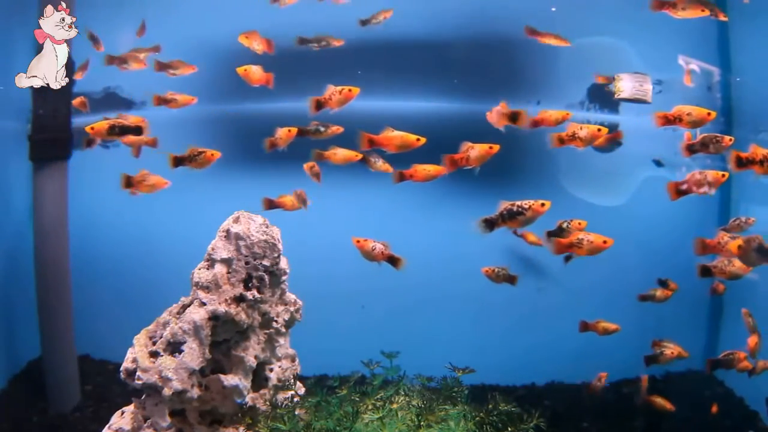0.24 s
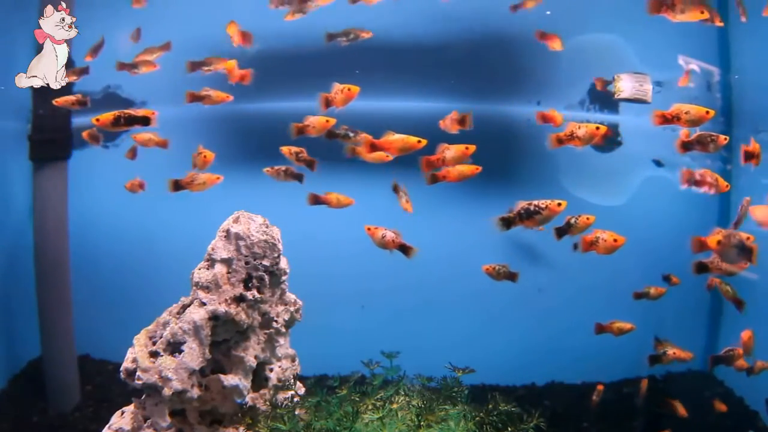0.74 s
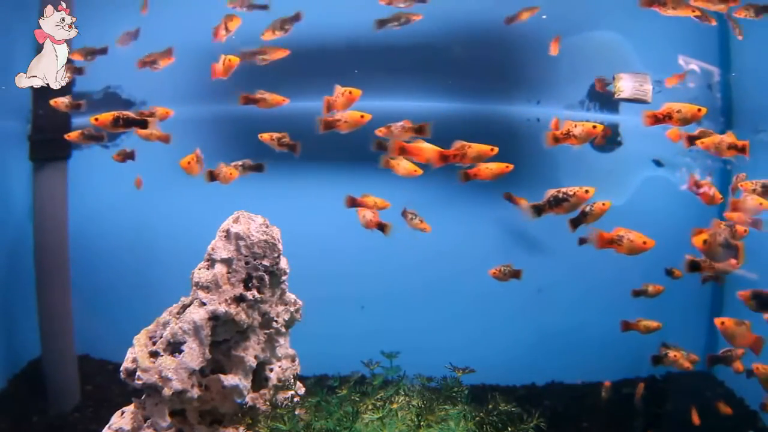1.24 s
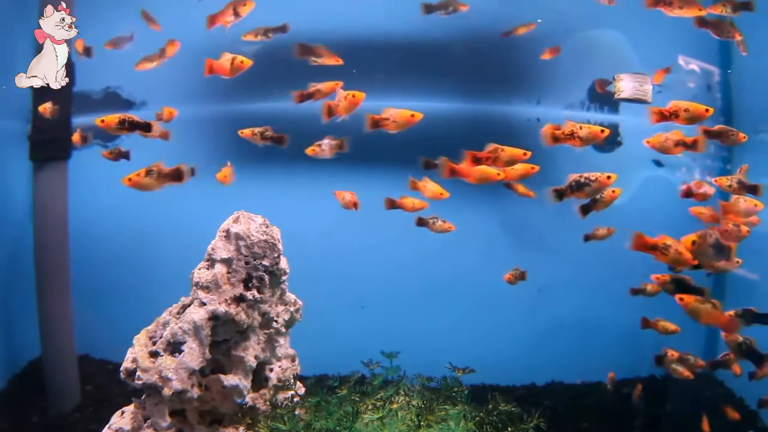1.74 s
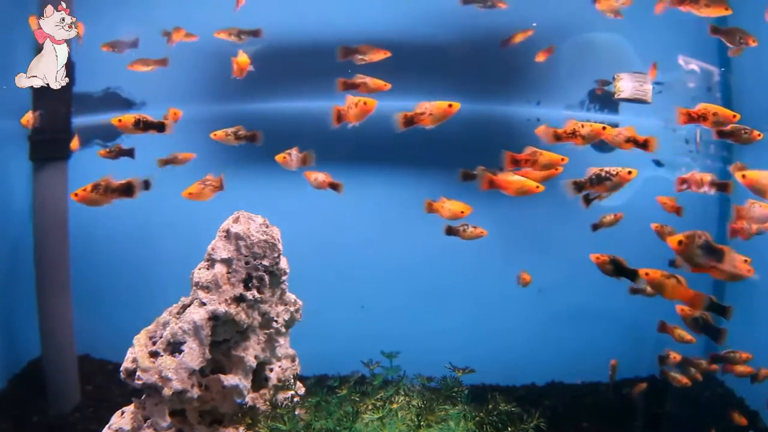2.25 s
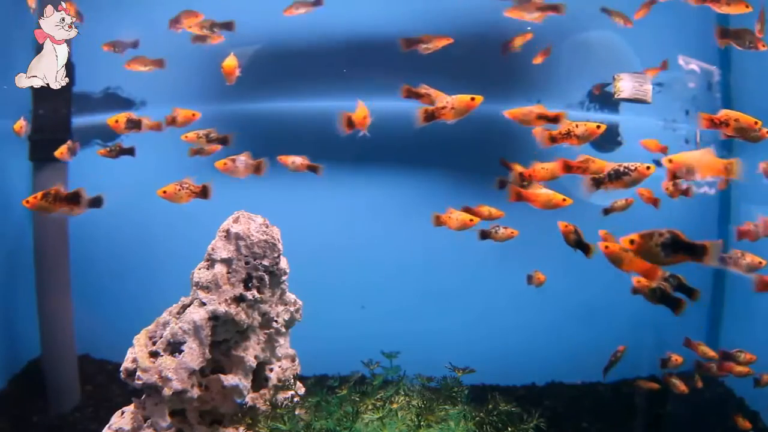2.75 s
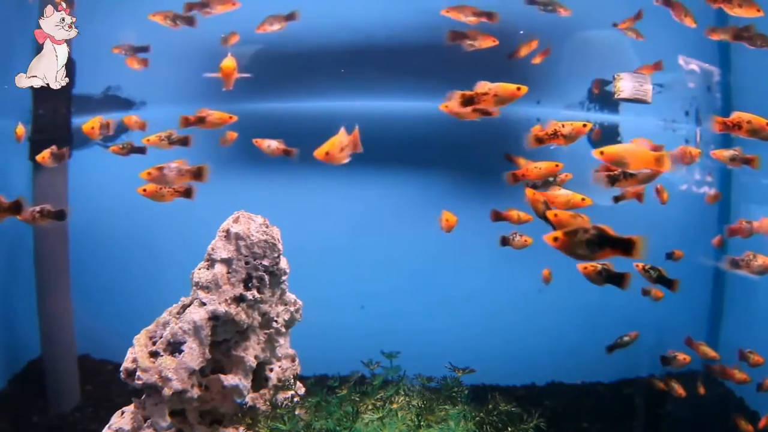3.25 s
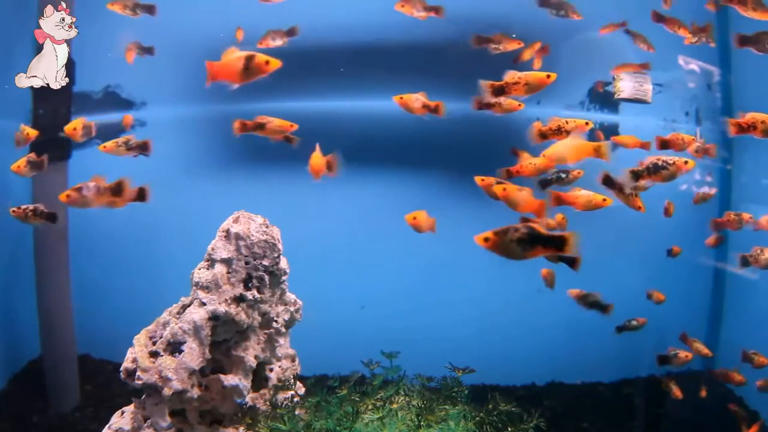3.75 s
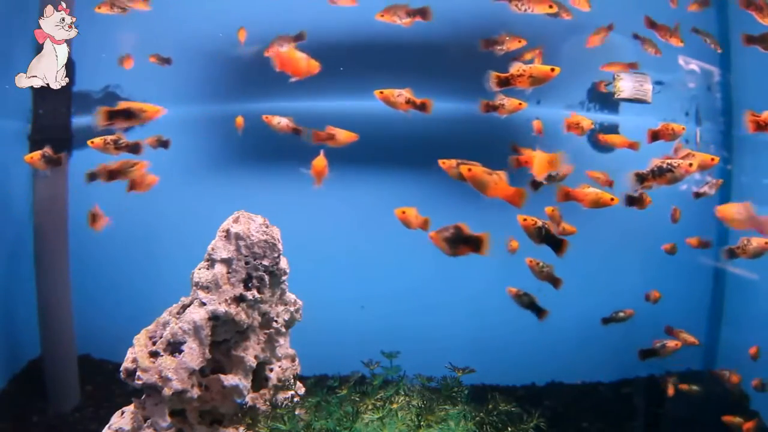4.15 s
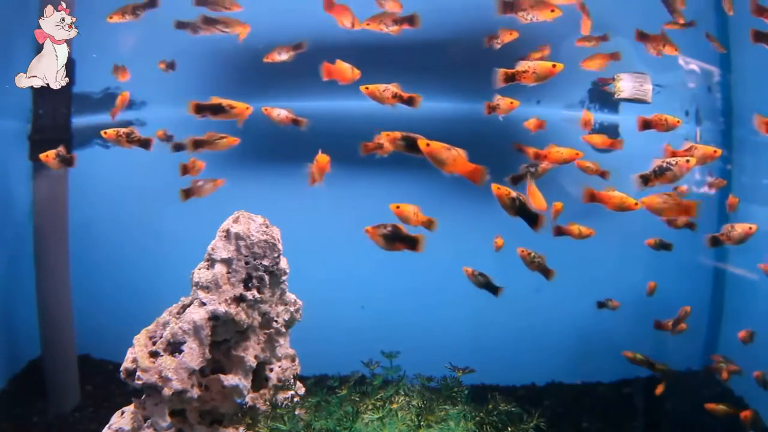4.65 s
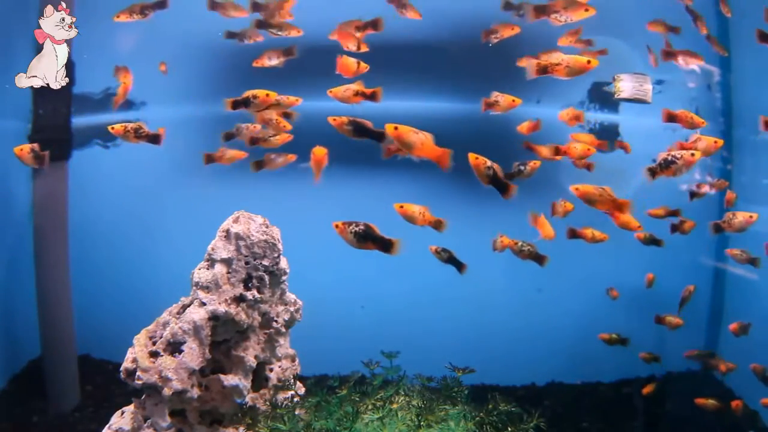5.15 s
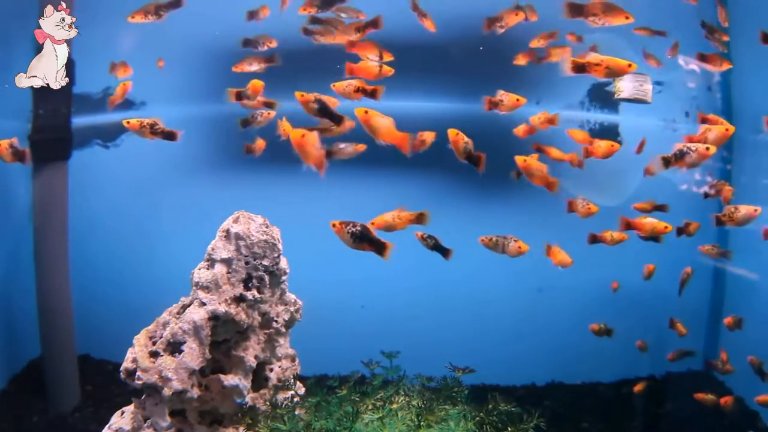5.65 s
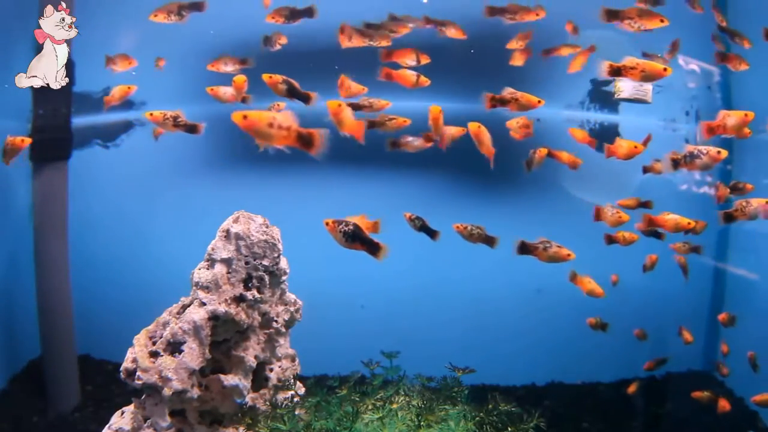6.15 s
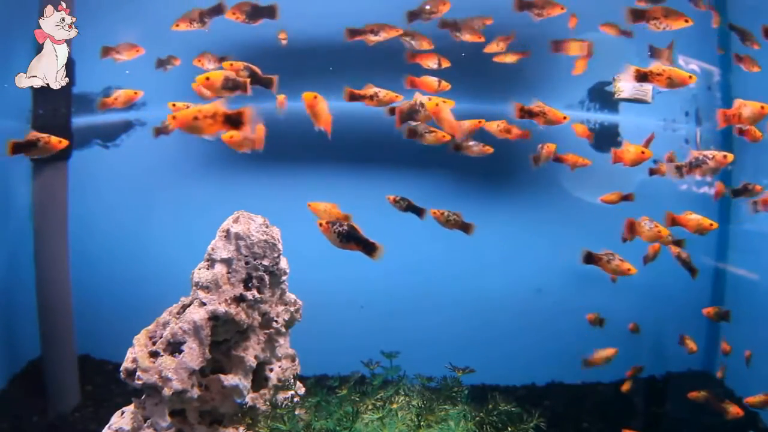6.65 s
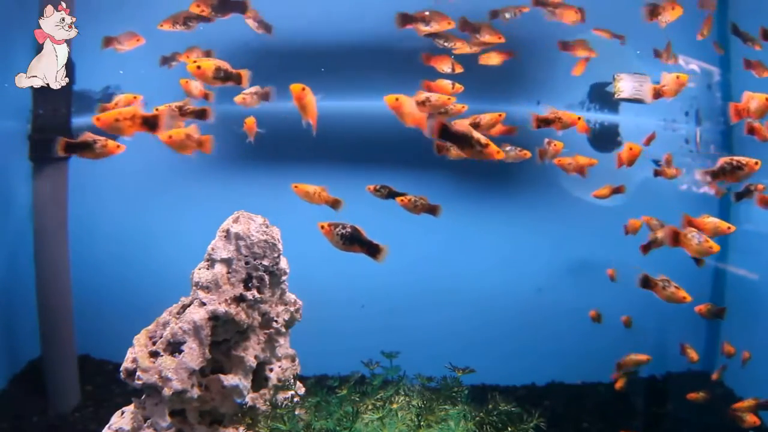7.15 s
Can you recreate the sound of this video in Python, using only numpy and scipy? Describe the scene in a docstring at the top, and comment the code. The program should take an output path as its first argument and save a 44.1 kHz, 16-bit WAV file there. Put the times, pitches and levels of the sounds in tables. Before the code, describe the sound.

Water trickles into a fish tank from the filter's outflow for the whole seven and a half seconds, heard close up in a small room. The sound is light and bright: a continuous fine fizz and gurgle of tiny bubbles, dotted with sharp ticking drops and short, high bubble plinks, many each second at uneven gaps. The flow sputters, swelling and easing a little without ever stopping. The sharpest drops land at about 1.1 to 1.3 seconds, 2.9, 3.4 and 7.2 seconds, and stronger bubbles ring out near 0.5, 2.5, 3.7 and 5.5 seconds. Slightly heavier spills add a soft slap and spatter around 0.7, 1.9, 3.4, 3.8, 4.8 and 6.6 seconds. The glass walls and the air above the water give everything a very short, slightly hollow echo. Underneath, a faint pump hum and the filter's low rush stay steady.

```python
"""A small room with a fish tank: the filter's return flow trickles into the water.
Drops tick on the surface, trapped air bubbles ring briefly and heavier spills slap.
The glass walls and the room echo each one, and the air space over the water resonates.
Underneath run a gurgle and fizz of tiny bubbles, the pump's hum and the filter's low rush."""
import sys
import numpy as np
from scipy import signal
from scipy.fft import rfft, irfft, next_fast_len
from scipy.io import wavfile
from scipy.ndimage import uniform_filter1d, map_coordinates

SR = 44100
rng = np.random.default_rng(int(sys.argv[2]) if len(sys.argv) > 2 else 0)


def master(y):
    """Save y as 16-bit WAV."""
    cut = np.clip(np.atleast_2d(y).T, -1, 1)
    pcm = np.round(cut * 32767)  # scale
    wavfile.write(sys.argv[1], SR, pcm.astype(np.int16))


N = 326340
EVENT_TIME_S = np.arange(SR // 25) / SR  # time axis of one bubble or burst


def amp(db):
    """Decibels to gain."""
    return 10 ** (np.asarray(db) / 20)


def unit_rms(x):
    """x at rms 1."""
    return x / np.sqrt(np.mean(x ** 2) + 1e-20)


def filtered(x, response):
    """x through a frequency response."""
    size = next_fast_len(N + SR // 4)
    return irfft(rfft(x, size) * response(np.fft.rfftfreq(size, 1 / SR)), size)[..., :N]


def coloured(x, curve):
    """x through an EQ curve on a log frequency axis, at rms 1."""
    freq_hz, gain_db = np.transpose(curve)
    return unit_rms(filtered(x, lambda hz: amp(np.interp(np.log(hz + 1), np.log(freq_hz), gain_db))))


def wobble(knots_per_s):
    """Smooth random curve."""
    knots = rng.standard_normal(N // 100)
    return map_coordinates(knots, [np.arange(N) * knots_per_s / SR], mode="mirror")


def add(track, start_s, sound):
    """Mix a stereo sound into the track."""
    start = max(round(start_s * SR), 0)
    part = sound[:, :max(N - start, 0)]
    track[:, start:start + part.shape[1]] += part


def echoes(glass_db, room_db, width, glass_t60_s=0.036, room_t60_s=0.13, pan_scatter_db=1):
    """Stereo path from one spot on the water: direct sound, quick echoes off the glass, then the room."""
    t = np.arange(SR // 5) / SR
    glass = amp(-60 * t / glass_t60_s) * (1 - np.exp(-t / 0.00025))
    room = amp(-60 * t / room_t60_s) * (1 - np.exp(-t / 0.005))
    decay = np.hypot(amp(glass_db) * glass / np.linalg.norm(glass),
                     amp(room_db) * room / np.linalg.norm(room))
    mid, side = rng.standard_normal((2, len(t))) * decay
    mid[0] += 1  # direct sound
    pan_db = rng.normal(0, pan_scatter_db) / 2
    return np.array([amp(pan_db) * (mid + width * side), amp(-pan_db) * (mid - width * side)])


def propagate(sound, path, level_db, window_s):
    """A short sound sent along a path, its loudest window scaled to level_db."""
    stereo = signal.fftconvolve(sound[None], path, axes=1)
    power = uniform_filter1d(stereo.mean(0) ** 2, max(int(window_s * SR), 1))
    return amp(level_db) * stereo / np.sqrt(power.max())


def bubble_ring(pitch_hz, cycles, rise, t):
    """A bubble rings down 60 dB over the given cycles, its pitch rising as it nears the surface."""
    age = pitch_hz * t / cycles
    phase = 2 * np.pi * pitch_hz * t * (1 + rise * np.minimum(age, 1))
    return np.sin(phase) * amp(-60 * age) * (1 - np.exp(-2 * pitch_hz * t))


def swarm(rate_per_s, low_hz, high_hz, cycles, spread_db, width, spots=8):
    """Many small bubbles ring at random moments from a few spots; most are faint, a few strong."""
    track = np.zeros((2, N))
    t = EVENT_TIME_S[:len(EVENT_TIME_S) // 3]
    for _ in range(spots):
        when, pitch, strength = rng.random((int(rate_per_s * N / SR / spots), 3)).T[..., None]
        gain = amp(spread_db * np.minimum(-np.log(1 - strength), 3))
        tones = gain * bubble_ring(low_hz * (high_hz / low_hz) ** pitch, cycles, rise=0.021, t=t)
        indices = (when * N).astype(int) + np.arange(len(t))
        spot = np.bincount(indices.ravel(), tones.ravel(), N)[:N]
        path = echoes(glass_db=6.0, room_db=2, width=width)
        track += signal.oaconvolve(spot[None], path, axes=1)[:, :N]
    return track


# Trickle strength: time_s, gurgle_db, spray_db
FLOW_LEVELS = [(0.0, -42.5, -40), (0.35, -43.5, -39), (0.7, -52.5, -41), (0.97, -43, -37), (1.35, -50, -43),
               (1.75, -49.5, -41.5), (2.3, -45, -39.5), (2.7, -46, -40), (3.2, -43.5, -38),
               (3.6, -44.5, -37.5), (4.35, -45, -38), (4.7, -47.5, -39.5), (5.4, -44, -37),
               (5.85, -43, -37.5), (6.05, -45.5, -41), (6.6, -51.5, -36.5), (6.95, -44.5, -41),
               (7.4, -44, -39)]


def flow_db(time_s):
    """Gurgle and spray levels as the flow swells and eases."""
    knots_s, gurgle_db, spray_db = np.transpose(FLOW_LEVELS)
    return {"gurgle": np.interp(time_s, knots_s, gurgle_db),
            "spray": np.interp(time_s, knots_s, spray_db)}


# Gurgle EQ: freq_hz, gain_db
GURGLE_EQ = [(300, -37), (1000, -12), (1400, -14.5), (1900, -14), (2500, -1.5), (3100, -3), (4000, -2.5),
             (5200, -1.5), (6500, -10), (10000, -30)]
# Spray EQ: freq_hz, gain_db
SPRAY_EQ = [(700, -38), (2000, -3), (4500, -12.5), (6200, -10), (7200, -7), (8500, -4), (10700, -2),
            (13000, 2), (14500, 1), (16000, 0.5)]
# Droplet EQ: freq_hz, gain_db
PATTER_EQ = [(300, -24), (900, -11), (1800, -10), (3000, 2), (4500, -8), (6000, -8), (9000, 2),
             (11500, 1.5), (16000, 4)]


def trickle(gurgle_db=-3.0, spray_db=-2.0, patter_db=-6.5, sputter_db=1.38, sputters_per_s=34):
    """Small bubbles gurgle, spray fizzes, droplets patter; all follow the flow and sputter together."""
    level_db = flow_db(np.arange(N) / SR)
    sputter = amp(sputter_db * wobble(sputters_per_s))
    bubbles = swarm(rate_per_s=320, low_hz=1052, high_hz=6020, cycles=32, spread_db=4.0, width=0.5)
    spray = swarm(rate_per_s=700, low_hz=4000, high_hz=16000, cycles=13.3, spread_db=5.0, width=0.67)
    # droplets too small to trap air click and hardly ring
    patter = swarm(rate_per_s=55, low_hz=3460, high_hz=10500, cycles=4.6, spread_db=3, width=0.57)
    gurgle = amp(gurgle_db) * coloured(bubbles, GURGLE_EQ)
    fizz = amp(spray_db) * coloured(spray, SPRAY_EQ) + amp(patter_db) * coloured(patter, PATTER_EQ)
    return sputter * (amp(level_db["gurgle"]) * gurgle + amp(level_db["spray"]) * fizz)


# Air space resonances: pitch_hz, bandwidth_hz, gain_db
AIR_MODES = [(841, 54, 8), (1256, 17, 0.5), (1554, 56, 7), (1802, 24, 7.5), (2206, 45, -0.5),
             (2950, 105, -1), (3296, 99, -2), (3660, 32, 3), (4390, 66, -5), (4640, 170, -2.5),
             (6630, 590, -2.5), (8160, 380, -9.5), (10680, 1250, -4.5)]


def air_space(water, gain_db=-4):
    """The air over the water rings on at its own pitches."""
    def response(hz):
        return sum(amp(mode_db) * 1j * hz * band_hz / (pitch_hz ** 2 - hz ** 2 + 1j * hz * band_hz)
                   for pitch_hz, band_hz, mode_db in AIR_MODES)
    return amp(gain_db) * filtered(water, response)


# Rush spectrum, common to both channels: freq_hz, gain_db
RUSH_MID_EQ = [(20, -12), (50, -11), (100, -10.5), (140, -5.5), (210, -10), (280, -3), (350, 3),
               (410, -0.5), (550, -5), (635, 0.5), (745, -8.5), (840, -3.5), (960, -10.5), (1200, -3.5),
               (2000, -26.5), (8000, -15)]
# Rush spectrum, stereo side: freq_hz, gain_db
RUSH_SIDE_EQ = [(20, -6), (90, -16), (140, 2.5), (220, -5), (400, -8.5), (900, -10.5), (4000, -18)]


def filter_rush(mid_db=-55.0, side_db=-58.0):
    """Low, steady rush of the filter in the room."""
    mid = amp(mid_db) * coloured(rng.standard_normal(N), RUSH_MID_EQ)
    side = amp(side_db) * coloured(rng.standard_normal(N), RUSH_SIDE_EQ)
    return np.array([mid + side, mid - side])


# Pump harmonics: mains_multiple, level_db
PUMP_HARMONICS = [(1, -73), (3, -82), (4, -98), (6, -71.5), (7, -80), (8, -73), (9, -77), (14, -74.5)]


def pump_hum(mains_hz=60, left_db=6.5):
    """The pump hums on multiples of the mains; its lowest note leans left."""
    t = np.arange(N) / SR
    tones = [np.sqrt(2) * amp(level_db) * np.sin(2 * np.pi * (multiple * mains_hz * t + rng.random()))
             for multiple, level_db in PUMP_HARMONICS]
    return tones[0] * amp([[left_db], [-left_db]]) + sum(tones[1:])


def splash(centre_hz, width_oct, t60_s, attack_s, low_cut_hz=480):
    """Torn water: a brief burst of band noise with no bass."""
    t = EVENT_TIME_S
    hz = np.fft.rfftfreq(len(t), 1 / SR) + 1
    noise = rng.standard_normal(len(t)) * amp(-60 * t / t60_s) * (1 - np.exp(-t / attack_s))
    delayed = np.roll(noise, SR // 1000)  # builds up just after contact
    band = 1 / (1 + (np.log2(hz / centre_hz) / width_oct) ** 2) ** 0.75
    low_cut = 1 / (1 + (low_cut_hz / hz) ** 3)
    return unit_rms(irfft(rfft(delayed) * band * low_cut))


def shed_events(part, rate_per_s, pitch_hz, scatter_oct, over_flow_db, scatter_db):
    """Events the stream sheds at uneven gaps, as loud as its flow: start_s, level_db, pitch_hz."""
    late, strength, detune = rng.standard_normal((int(rate_per_s * N / SR), 3)).T
    start_s = (np.arange(len(late)) + 0.5 + 0.5 * late) / rate_per_s
    level_db = flow_db(start_s)[part] + over_flow_db + scatter_db * strength
    return list(zip(start_s, level_db, pitch_hz * 2 ** (scatter_oct * detune)))


# Loudest drops: start_s, level_db, snap_hz, low_splash_db
LOUD_DROPS = [(0.026, -21.5, 10200, -25), (0.21, -21, 8550, -0.5), (0.347, -23, 8900, -4),
              (0.415, -24.5, 9400, 1), (0.665, -19.5, 11100, -32), (0.756, -20.5, 11100, -30),
              (1.098, -14.5, 11300, -19), (1.186, -12.5, 10900, -17), (1.251, -16, 10300, -28),
              (1.444, -24, 6400, -1), (1.544, -19, 11500, -30), (1.783, -22.5, 9300, -6),
              (2.597, -21, 9100, -19), (2.753, -22, 10900, -30), (2.879, -14.5, 12600, -5),
              (3.325, -17.5, 10400, -5.5), (3.418, -17.5, 10100, -30), (3.854, -21, 7550, -24),
              (4.025, -19.5, 10200, -7), (4.41, -18, 8950, -7), (5.11, -25, 5200, 5),
              (5.322, -19.5, 10600, -4), (5.396, -21.5, 7960, -7), (5.459, -24, 10300, -3),
              (6.047, -23.5, 9000, -26), (6.105, -21.5, 7640, -29), (6.361, -23.5, 8500, -22),
              (6.653, -23, 11700, -18), (7.178, -17, 10300, -14), (7.206, -19.5, 11600, -14),
              (7.296, -24.5, 10300, -19)]


def drops(gain_db=-5.5, low_trim_db=-2, usual_low_db=-14):
    """Each drop hits with a bright snap and a slower, lower, mostly weaker splash."""
    track = np.zeros((2, N))
    usual = shed_events("spray", rate_per_s=5.5, pitch_hz=9500, scatter_oct=0.41,
                        over_flow_db=12, scatter_db=1.5)
    for start_s, level_db, snap_hz, low_db in LOUD_DROPS + [(*row, usual_low_db) for row in usual]:
        snap = splash(snap_hz, width_oct=0.32, t60_s=0.0058, attack_s=0.0011)
        low = splash(centre_hz=3800, width_oct=0.79, t60_s=0.019, attack_s=0.0022)
        drop = snap + amp(low_db + low_trim_db) * low
        path = echoes(glass_db=5.0, room_db=-5.5, width=0.58)
        add(track, start_s, propagate(drop, path, level_db + gain_db, window_s=0.00052))
    return track


# Loudest bubbles: start_s, level_db, pitch_hz
LOUD_BUBBLES = [(0.052, -44, 1160), (0.07, -33, 2960), (0.23, -36, 3700), (0.313, -34, 2970),
                (0.538, -31.5, 3060), (0.61, -35.5, 3290), (0.86, -37, 3280), (0.949, -34.5, 3100),
                (1.048, -41.5, 1456), (1.186, -38.5, 3090), (1.217, -43.5, 1330), (1.268, -41, 1350),
                (1.285, -41, 1260), (1.446, -33.5, 3000), (1.448, -40, 1610), (1.528, -42.5, 1257),
                (1.911, -33.5, 2420), (1.919, -33, 3280), (2.11, -43, 1560), (2.276, -43.5, 1146),
                (2.473, -39, 1576), (2.517, -30, 3270), (2.749, -42, 1410), (3.325, -34, 2840),
                (3.36, -40, 1854), (3.446, -42, 1180), (3.681, -30, 2960), (4.143, -40, 1500),
                (4.273, -43.5, 1243), (4.426, -36, 3050), (4.541, -34.5, 3300), (4.761, -36, 3380),
                (4.789, -34.5, 2380), (4.943, -43.5, 1690), (5.051, -43, 1265), (5.233, -33.5, 3060),
                (5.369, -36, 2950), (5.458, -31.5, 3320), (5.668, -38.5, 1555), (5.771, -38.5, 2530),
                (5.831, -38, 3030), (5.914, -37.5, 2910), (6.427, -35, 2740), (6.483, -36.5, 3060),
                (6.599, -37, 2650), (6.762, -43, 1580), (7.208, -31.5, 4740), (7.221, -37.5, 1476),
                (7.341, -37.5, 3060)]
# Usual bubble sizes: rate_per_s, pitch_hz, scatter_oct, over_flow_db
USUAL_BUBBLES = [(7.5, 1582, 0.1, -2), (13, 3040, 0.2, 4), (4, 4640, 0.15, 2.5)]


def large_bubbles(gain_db=1.5, median_cycles=38, pinch_db=-17, pinch_ratio=1.36):
    """Single bubbles pinch off with a small splash and ring: a few loud ones among many usual ones."""
    track = np.zeros((2, N))
    usual = [row for size in USUAL_BUBBLES for row in shed_events("gurgle", *size, scatter_db=1.1)]
    for start_s, level_db, pitch_hz in LOUD_BUBBLES + usual:
        cycles = median_cycles * np.exp(0.18 * rng.standard_normal())
        tone = unit_rms(bubble_ring(pitch_hz, cycles, rise=0.014, t=EVENT_TIME_S))
        pinch = splash(pitch_hz * pinch_ratio, width_oct=0.67, t60_s=0.0099, attack_s=0.001)
        bubble = tone + amp(pinch_db) * pinch
        path = echoes(glass_db=4.5, room_db=-3.5, width=0.46)
        add(track, start_s, propagate(bubble, path, level_db + gain_db, window_s=0.0066))
    return track


# Heavier spills: start_s, level_db
HEAVY_SPILLS = [(0.747, -42.5), (1.909, -43), (3.114, -55), (3.361, -40.5), (3.781, -42.5), (4.809, -42.5),
                (5.88, -48), (6.597, -44)]


def spills(slap_db=-9.0, spatter_db=3.0):
    """A heavier spill hits the surface with a soft, low slap and spatters."""
    track = np.zeros((2, N))
    for start_s, level_db in HEAVY_SPILLS:
        path = echoes(glass_db=1.5, room_db=2.5, width=0.48)
        slap = splash(centre_hz=600, width_oct=0.51, t60_s=0.02, attack_s=0.0018)
        spatter = splash(centre_hz=2300, width_oct=0.61, t60_s=0.021, attack_s=0.00083)
        add(track, start_s, propagate(slap, path, level_db + slap_db, window_s=0.012))
        add(track, start_s, propagate(spatter, path, level_db + spatter_db, window_s=0.0027))
    return track


def scene(water_db=-1, right_db=0.5):
    """Water falls slightly right of the microphone, over the rush and the hum."""
    water = amp(water_db) * (large_bubbles() + drops() + spills() + trickle())
    balance = amp([[-right_db], [right_db]])
    return (water + air_space(water) + filter_rush()) * balance + pump_hum()


def record(dry, rolloff_hz=15500, band_limit_hz=15780):
    """The microphone dulls the highest treble; nothing passes above the band limit."""
    return filtered(dry, lambda hz: (hz < band_limit_hz) / np.sqrt(1 + (hz / rolloff_hz) ** 8))


dry = scene()
out = record(dry)
master(out)
```